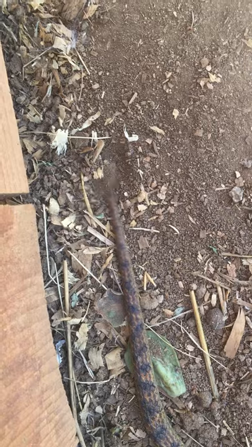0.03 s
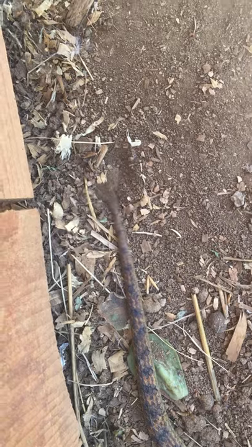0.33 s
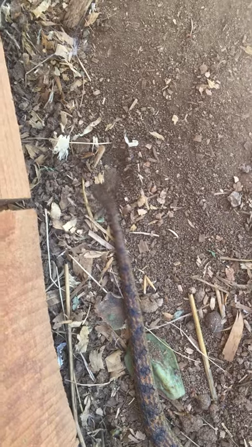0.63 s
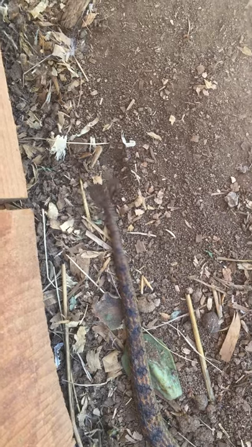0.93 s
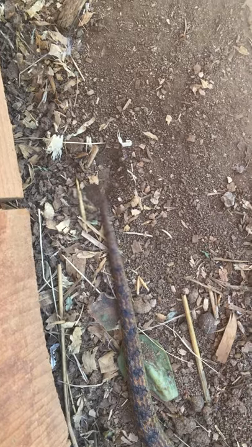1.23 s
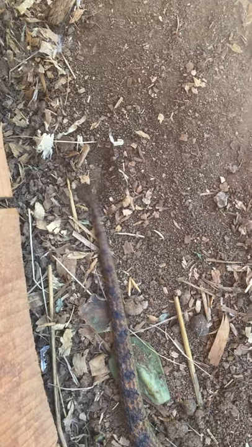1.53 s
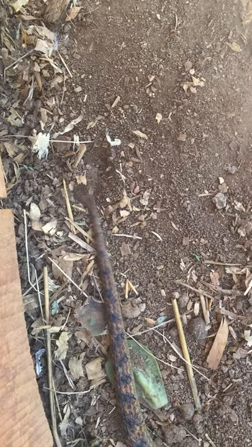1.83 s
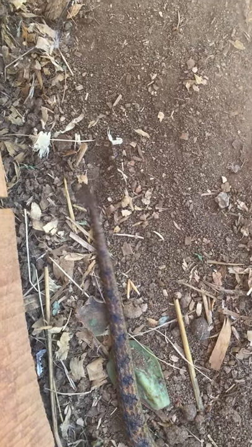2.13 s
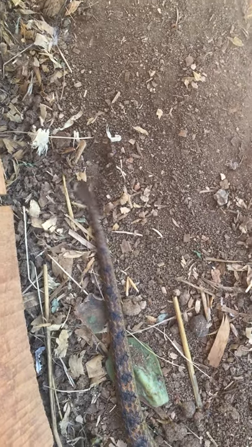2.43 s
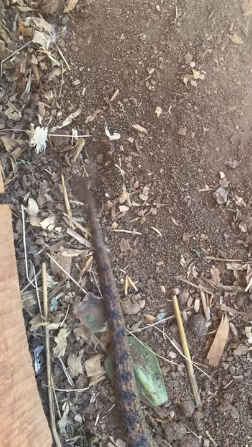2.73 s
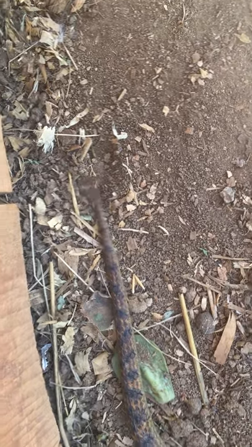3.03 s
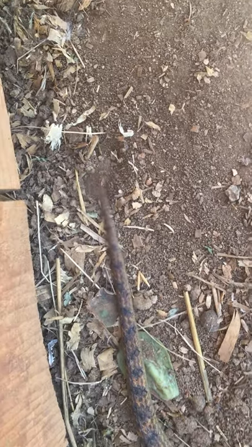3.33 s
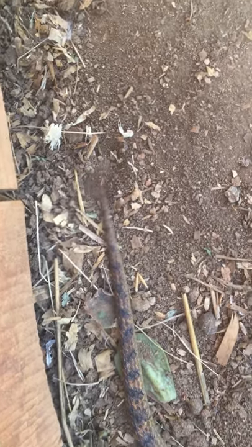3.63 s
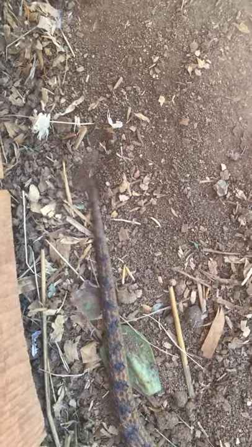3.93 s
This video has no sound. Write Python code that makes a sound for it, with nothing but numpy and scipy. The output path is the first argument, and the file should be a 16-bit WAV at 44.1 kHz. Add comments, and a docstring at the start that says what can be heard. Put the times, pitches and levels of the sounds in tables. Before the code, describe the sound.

Outdoors, a snake shakes its tail in dry leaf litter, making a rapid buzzing rattle that pauses briefly and resumes. Soft low handling bumps touch the microphone early, and a nearby wooden panel shuts with a boom near the end.

```python
"""Outdoors, in dry leaf litter. A snake shakes its tail at about 50 Hz: two bouts, a short rest.
Each swing makes four contacts with leaves, grit and sand; each clicks, crackles and rustles.
Near the end a wooden panel bangs shut close by, booms and settles.
Soft low bumps reach the hand-held microphone. Faint air lies below."""
import sys
import numpy as np
from scipy import signal
from scipy.fft import rfft, irfft
from scipy.io import wavfile

SR = 44100
rng = np.random.default_rng(int(sys.argv[2]) if len(sys.argv) > 2 else 0)


def waveform_to_disk(signal):
    """Save audio, clipped to [-1, 1], as 16-bit WAV at the path in sys.argv[1]."""
    frames = np.transpose(np.atleast_2d(signal))
    scaled = np.clip(frames, -1, 1) * 32767
    samples = np.round(scaled).astype(np.int16)
    wavfile.write(sys.argv[1], SR, samples)


N = 176400
TIME_S = np.arange(N) / SR

# tail swing rate per bout: t/s, f/Hz
BOUT_1_RATE = [(0.085, 51.88), (0.3, 49.78), (0.68, 51.59), (0.82, 49.33), (0.98, 52.08), (1.15, 49.68),
               (1.4, 48.19), (1.56, 51.49), (1.82, 49.09), (2, 51.15), (2.25, 50.11), (2.5, 48.31),
               (2.65, 44.01)]
BOUT_2_RATE = [(2.8, 62.41), (2.95, 54.24), (3.18, 49.25), (3.34, 52.38), (3.5, 47.74), (3.7, 50.49),
               (4.0, 50.8)]
# contacts in one swing: phase/cycles, leaf gain/dB, grit and sand gain/dB, jitter/s
BOUT_1_CONTACTS = [(0, -14, 1, .0002), (0.239, -24.5, -40, 0.00037), (0.486, 1, -7.5, .0002),
                   (0.761, -6.5, -25, .0003)]
BOUT_2_CONTACTS = [(0, -9, -0.5, 0.00023), (0.199, -19.5, -34, 0.00048), (.45, 1, -6.5, 0.00044),
                   (.81, 1, -8.5, .0004)]
# contact force: t/s, leaf level/dB, grit level/dB, sand level/dB
CONTACT_FORCE = [(.1, -34.5, -36, -36.5), (.5, -35.5, -36, -34), (.95, -36, -34, -35.5),
                 (1.14, -31, -34, -37), (1.3, -32, -39, -35), (1.45, -37.5, -34.5, -33),
                 (1.56, -30.5, -35.5, -35), (1.74, -32, -35.5, -34.5), (1.9, -30.5, -35, -38),
                 (2.15, -31.5, -32, -30), (2.28, -31.5, -41.5, -41), (2.41, -27.5, -35.5, -36),
                 (2.63, -28.5, -35.5, -33), (2.82, -36, -32.5, -24.5), (2.93, -32.5, -34, -36),
                 (3.15, -31, -32.5, -26.5), (3.23, -27.5, -34, -32), (3.32, -27.5, -39, -30),
                 (3.347, -39, -41, -43), (3.38, -31, -30.5, -25.5), (3.78, -30.5, -32, -31.5),
                 (3.86, -37.5, -41.5, -32), (3.979, -33.5, -32, -29)]
# litter spectra: f/Hz, level/dB
LEAF_SPECTRUM = [(300, -22), (950, -9), (1300, -4.5), (1650, 3.5), (2250, -4), (2550, -1), (2800, -2),
                 (3150, 2.5), (3450, -4.5), (3750, 1), (4150, -8.5), (4550, -1), (5050, -16), (9000, -14.5),
                 (17000, -33)]
GRIT_SPECTRUM = [(300, -8.5), (1500, -16.5), (4000, -2), (5300, -7), (6700, -3), (7700, -5), (9300, -1.5),
                 (10400, -8.5), (12300, -3), (14700, -10.5), (17000, -19)]
SAND_SPECTRUM = [(300, -46), (5000, -29), (9000, -9), (10400, -10.5), (12300, -4), (14700, -8.5),
                 (16800, -5.5)]

# panel blows: t/s, boom level/dB, clack level/dB
PANEL_BLOWS = [(3.5009, -65, -35), (3.5085, -23.5, -33), (3.514, -38, -35.5), (3.5250, -29, -34),
               (3.533, -25, -59), (3.558, -39.5, -70), (3.606, -38, -49.5), (3.66, -40.5, -47.5)]
# panel modes: f/Hz, level/dB, T60/s
BOOM_MODES = [(80.7, -13, 0.254), (119.7, -11.5, 0.294), (178.7, 0, 0.18), (249, -9, 0.084),
              (299.5, -9.5, 0.144), (367, -32, 0.3)]
CLACK_MODES = [(545, -23, 0.069), (826, -9.5, 0.097), (1116, -6.5, 0.043), (1280, -12.5, 0.08),
               (1364, -7.5, 0.037), (1634, -3.5, 0.038), (1750, -13.5, 0.034), (2016, -13, .06),
               (2290, -14, 0.082)]
KNOCK_MODES = [(76, 2.5, 0.1), (141, 4, 0.065), (324, 0, 0.068), (486, -2.5, .025), (760, -20, 0.013)]
# bang reverberation, octave bands: f/Hz, level/dB, T60/s
REVERB_BANDS = [(151, -28.5, 0.54), (329, -51.5, 1), (700, -52, 0.8), (1470, -56, 0.55), (1877, -45, 0.56),
                (3570, -54, .4)]

# microphone bumps: t/s, half-width/s, f/Hz, level/dB
MIC_BUMPS = [(0.173, 0.013, 89.5, -42.5), (0.239, 0.019, 109, -51.5), (.46, 0.042, 152, -55),
             (.492, 0.013, 80, -38), (0.523, 0.014, 59.7, -40.5), (0.712, 0.019, 96, -53),
             (.872, 0.012, 105, -50.5), (0.941, 0.025, 82, -50.5), (1.04, 0.013, 84, -48.5),
             (1.464, .018, 84, -48.5), (1.804, 0.026, 73, -51.5)]
# handling rumble envelope: t/s, level/dB
RUMBLE_ENVELOPE = [(.1, -58.5), (.35, -63.5), (.47, -51), (.6, -63), (.9, -60), (1.1, -64), (1.7, -61.5),
                   (2.35, -64.5), (2.6, -69), (3.4, -66), (4, -70)]
# background spectra: f/Hz, level/dB
RUMBLE_SPECTRUM = [(20, -36), (40, -5), (62, 2.5), (90, 0), (140, -3.5), (260, -10), (420, -22),
                   (900, -44.5)]
AIR_SPECTRUM = [(30, -5.5), (120, 2), (300, 4), (700, 1.5), (1500, -3.5), (4000, -6.5), (9000, -12.5),
                (17000, -12.5)]


def snake_tail():
    """Two bouts of tail strikes on leaves, grit and sand."""
    first = bout_clicks(BOUT_1_RATE, BOUT_1_CONTACTS, start_cycles=.235)
    second = bout_clicks(BOUT_2_RATE, BOUT_2_CONTACTS, start_cycles=.53)
    leaf, grit, sand = first + second
    return (litter_crunch(leaf, LEAF_SPECTRUM, crackle_db=-6.5, rustle_db=-31)
            + litter_crunch(grit, GRIT_SPECTRUM, crackle_db=-8, rustle_db=-36.5)
            + litter_crunch(sand, SAND_SPECTRUM, crackle_db=-19, rustle_db=-38.5))


def bout_clicks(rate, contacts, start_cycles, leaf_spread_db=2.26, grit_spread_db=4):
    """Each swing repeats the same contacts. Returns leaf, grit and sand click trains."""
    rate_s, rate_hz = np.transpose(rate)
    bout_s = TIME_S[(TIME_S >= rate_s[0]) & (TIME_S <= rate_s[-1])]
    swing_cycles = start_cycles + np.cumsum(np.interp(bout_s, rate_s, rate_hz)) / SR
    force_s, *force_db = np.transpose(CONTACT_FORCE)
    trains = np.zeros((3, N))
    for phase_cycles, leaf_db, grit_db, jitter_s in contacts:
        hit_cycles = np.arange(int(swing_cycles[-1]) + 1) + phase_cycles
        in_bout = (hit_cycles > swing_cycles[0]) & (hit_cycles < swing_cycles[-1])
        time_dev, leaf_dev, grit_dev, sand_dev = rng.standard_normal((len(hit_cycles), 4)).clip(-2, 2).T
        hit_s = np.interp(hit_cycles, swing_cycles, bout_s) + jitter_s * time_dev
        gains_db = (leaf_db + leaf_spread_db * leaf_dev,
                    grit_db + grit_spread_db * grit_dev,
                    grit_db + grit_spread_db * (grit_dev + sand_dev))
        for train, curve_db, gain_db in zip(trains, force_db, gains_db):
            hit_db = np.interp(hit_s, force_s, curve_db) + gain_db
            train += clicks(hit_s, in_bout * from_db(hit_db))
    return trains


def litter_crunch(hits, spectrum, crackle_db, rustle_db, crackles_per_s=3500):
    """Struck litter: a sharp click, a burst of crackles, a faint rustle."""
    grains = (rng.random(N) < crackles_per_s / SR) * rng.standard_normal(N)
    crackle = grains * fade(hits, decay_s=.0011)
    rustle = rng.standard_normal(N) * np.sqrt(fade(hits ** 2, decay_s=.0056))
    return colour(hits + from_db(crackle_db) * crackle + from_db(rustle_db) * rustle, spectrum)


def panel_bang(chatter_s=.003, chatter_db=-8.5, clack_band_hz=(794, 2320),
               knock_s=3.773, knock_db=-42.5, radiation_cutoff_hz=56):
    """A wooden panel hits, chatters and settles with a last knock; it radiates little deep bass."""
    blow_s, boom_db, clack_db = np.transpose(PANEL_BLOWS)
    boom = ring(clicks(blow_s, from_db(boom_db)), BOOM_MODES)
    hits = clicks(blow_s, from_db(clack_db))
    chatter = rng.standard_normal(N) * fade(hits, chatter_s) / np.sqrt(chatter_s * SR / 2)
    clack = ring(hits + from_db(chatter_db) * chatter, CLACK_MODES)
    clack = butterworth(clack, "band", clack_band_hz, order=4)
    knock = ring(clicks([knock_s], from_db(knock_db)), KNOCK_MODES)
    return butterworth(boom + clack + knock + bang_reverb(), "high", radiation_cutoff_hz, order=2)


def bang_reverb(onset_s=3.508, rise_s=.0096):
    """Diffuse reverberation, decaying band by band."""
    age_s = np.maximum(TIME_S - onset_s, 0)
    out = np.zeros(N)
    for hz, db, t60_s in REVERB_BANDS:
        band = butterworth(rng.standard_normal(N), "band", [hz / np.sqrt(2), hz * np.sqrt(2)], order=5)
        envelope = (1 - np.exp(-age_s / rise_s)) * from_db(-60 * age_s / t60_s)
        out += from_db(db) * envelope * unit_rms(band)
    return out


def handling_noise():
    """Hand on the microphone: low rumble, soft bumps of a few cycles."""
    rumble_db = np.interp(TIME_S, *np.transpose(RUMBLE_ENVELOPE))
    out = from_db(rumble_db) * noise(RUMBLE_SPECTRUM)
    for peak_s, half_width_s, hz, db in MIC_BUMPS:
        offset_s = TIME_S - peak_s
        envelope = np.exp(-(offset_s / half_width_s) ** 2)
        out += from_db(db) * envelope * np.cos(2 * np.pi * hz * offset_s)
    return out


def outdoor_air(level_db=-69.5):
    """Faint, steady broadband noise."""
    return from_db(level_db) * noise(AIR_SPECTRUM)


def from_db(db):
    """Decibels to gain."""
    return 10 ** (np.asarray(db) / 20)


def unit_rms(x):
    """Scale to rms 1."""
    return x / np.sqrt(np.mean(x ** 2) + 1e-20)


def clicks(times_s, gains):
    """One-sample impulses."""
    out = np.zeros(N)
    np.add.at(out, np.clip((np.asarray(times_s) * SR).astype(int), 0, N - 1), gains)
    return out


def fade(x, decay_s):
    """Exponential decay after each impulse."""
    return signal.lfilter([1], [1, -np.exp(-1 / (decay_s * SR))], x + 1e-18)


def ring(x, modes):
    """Damped modes driven by x."""
    out = np.zeros(N)
    for hz, db, t60_s in modes:
        radius = from_db(-60 / (t60_s * SR))
        step_rad = 2 * np.pi * hz / SR
        feedback = [1, -2 * radius * np.cos(step_rad), radius ** 2]
        out += signal.lfilter([0, from_db(db) * np.sin(step_rad)], feedback, x + 1e-18)
    return out


def butterworth(x, kind, edges_hz, order):
    """Causal, maximally flat filter."""
    return signal.sosfilt(signal.butter(order, edges_hz, kind, fs=SR, output="sos"), x)


def colour(x, spectrum, taps=8192):
    """Minimum-phase filter from a table of f/Hz, level/dB."""
    hz, db = np.transpose(spectrum)
    grid_hz = np.maximum(np.arange(taps // 2 + 1) * SR / taps, 1)
    grid_db = np.interp(np.log(grid_hz), np.log(hz), db)
    cepstrum = irfft(np.log(from_db(grid_db)))
    cepstrum[1:taps // 2] *= 2   # fold onto positive time
    cepstrum[taps // 2 + 1:] = 0
    impulse_response = irfft(np.exp(rfft(cepstrum)))
    return signal.fftconvolve(x, impulse_response)[:N]


def noise(spectrum):
    """Coloured noise, rms 1."""
    return unit_rms(colour(rng.standard_normal(N), spectrum))


def scene():
    """Mono sum: tail, bang, handling, air."""
    return (snake_tail() + panel_bang() + handling_noise() + outdoor_air())[None]


def record(dry, low_cut_hz=47.4, high_cut_hz=17150, start_s=.084):
    """Deep bass and top cut; silent until start_s."""
    gated = butterworth(dry, "high", low_cut_hz, order=3) * (TIME_S > start_s)
    lowpass = signal.ellip(12, .2, 70, high_cut_hz, fs=SR, output="sos")
    return signal.sosfilt(lowpass, gated)


dry = scene()
out = record(dry)
waveform_to_disk(out)
```